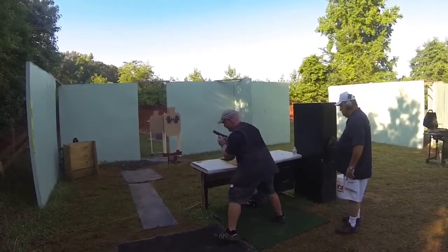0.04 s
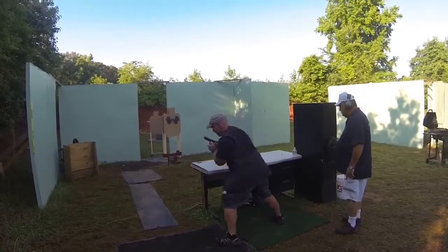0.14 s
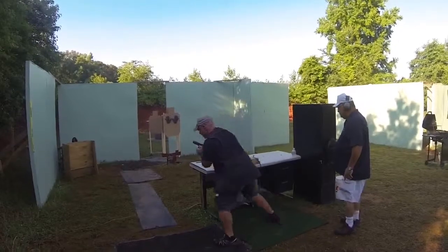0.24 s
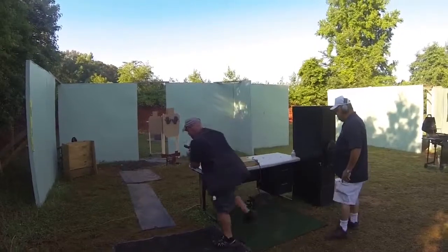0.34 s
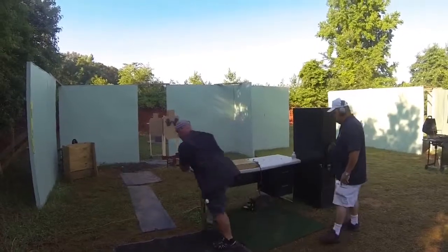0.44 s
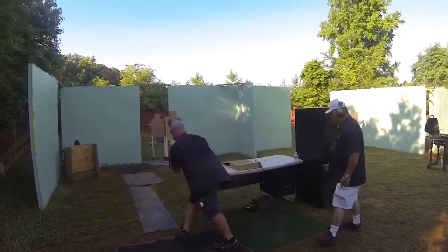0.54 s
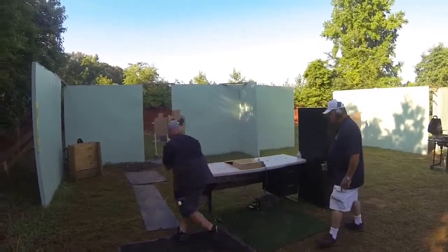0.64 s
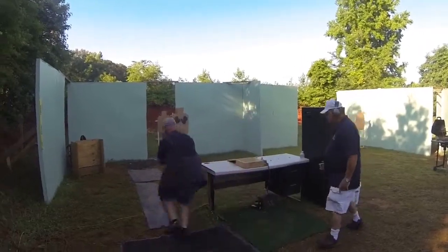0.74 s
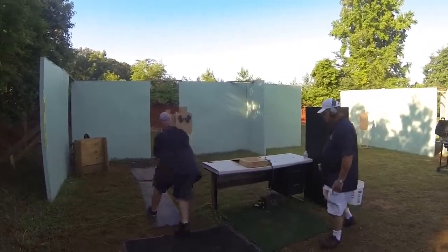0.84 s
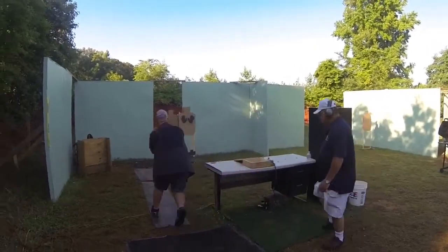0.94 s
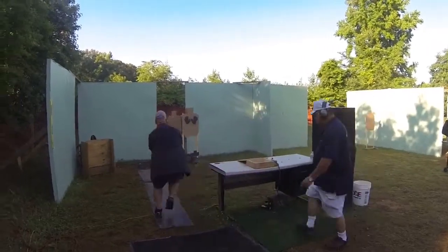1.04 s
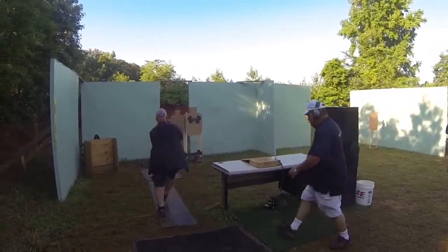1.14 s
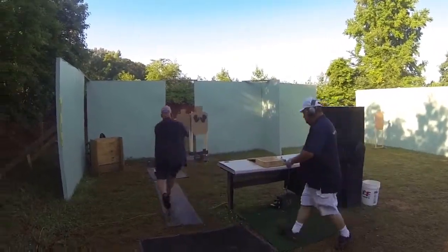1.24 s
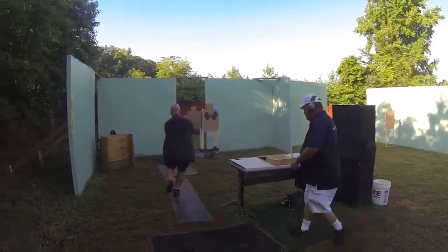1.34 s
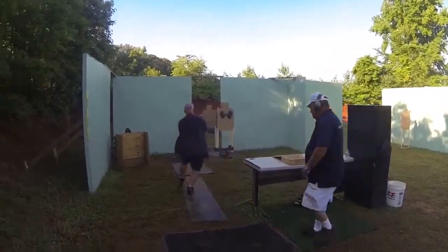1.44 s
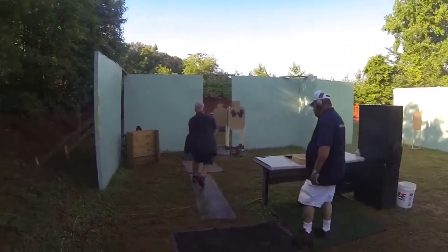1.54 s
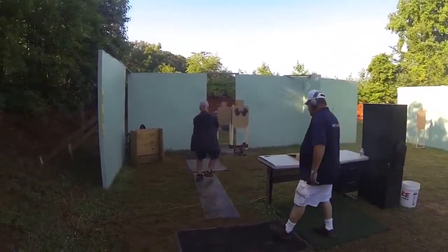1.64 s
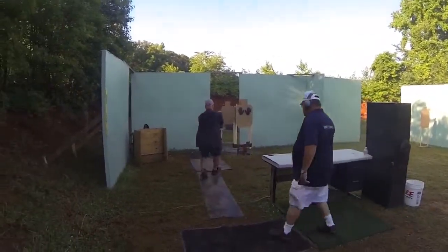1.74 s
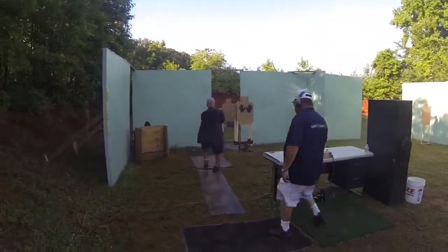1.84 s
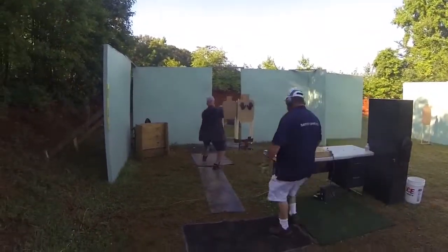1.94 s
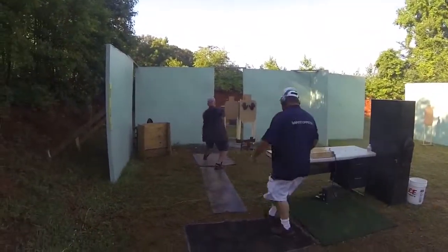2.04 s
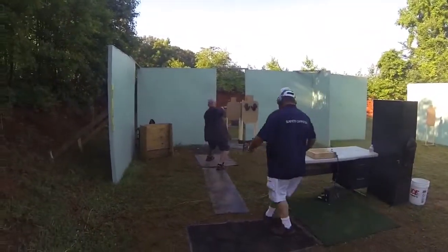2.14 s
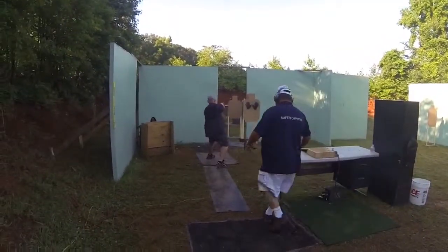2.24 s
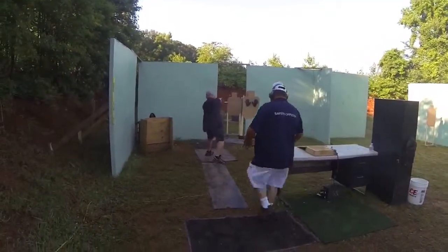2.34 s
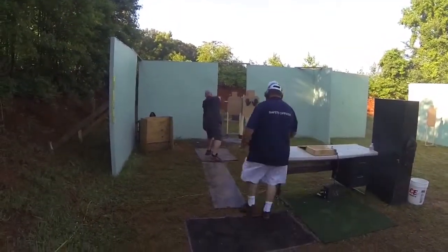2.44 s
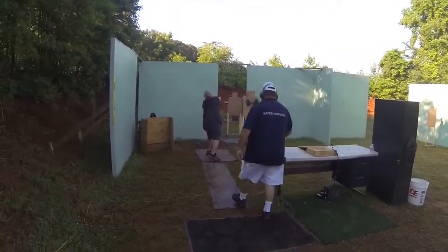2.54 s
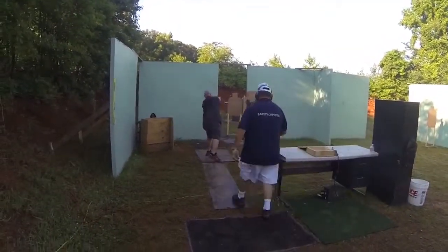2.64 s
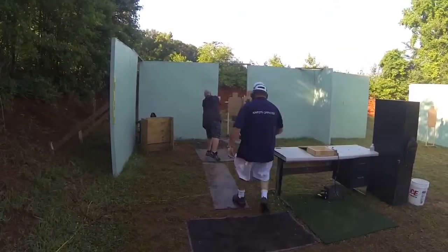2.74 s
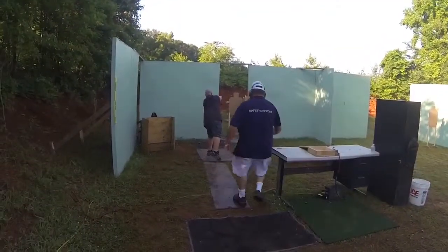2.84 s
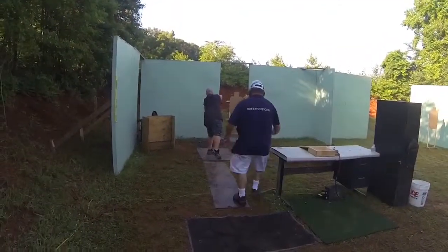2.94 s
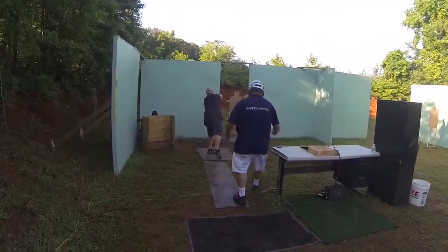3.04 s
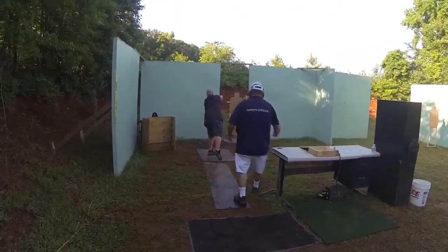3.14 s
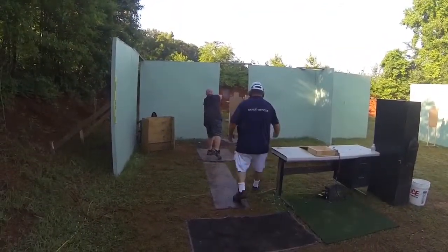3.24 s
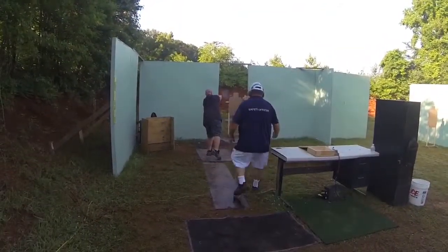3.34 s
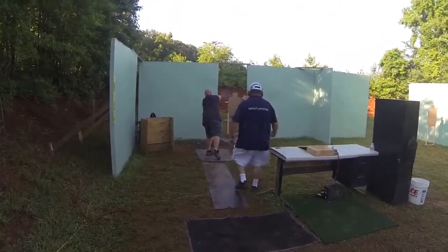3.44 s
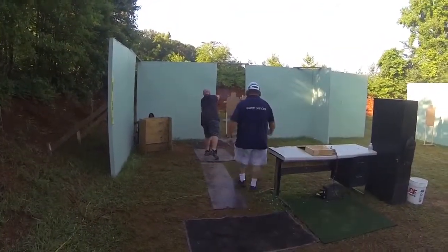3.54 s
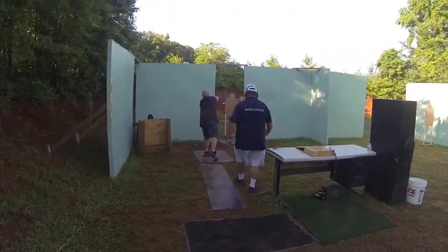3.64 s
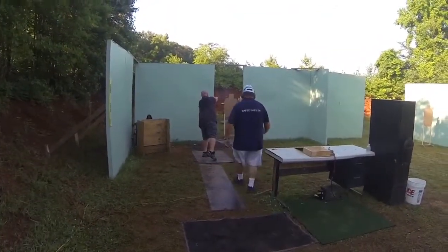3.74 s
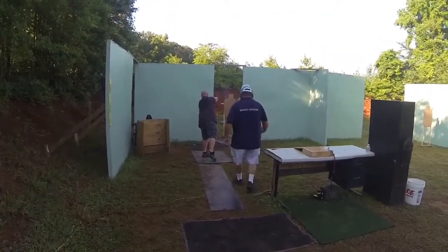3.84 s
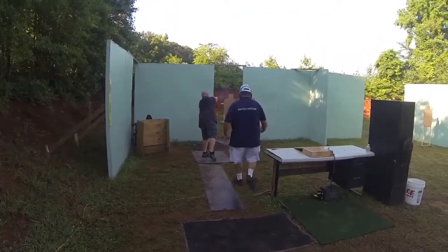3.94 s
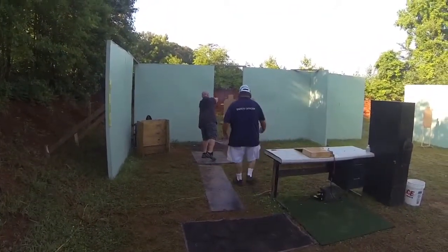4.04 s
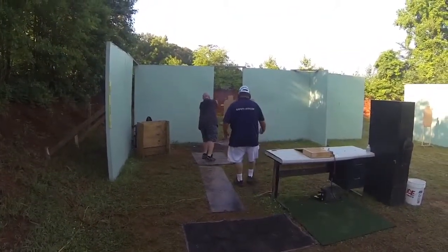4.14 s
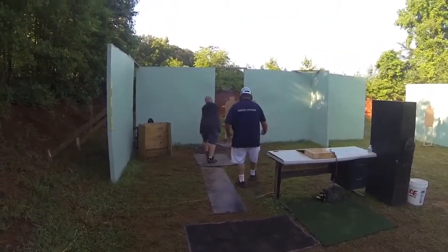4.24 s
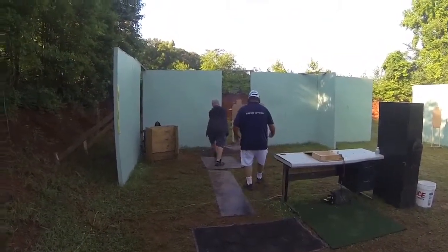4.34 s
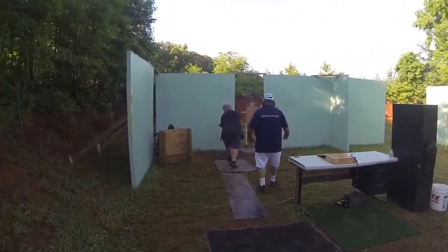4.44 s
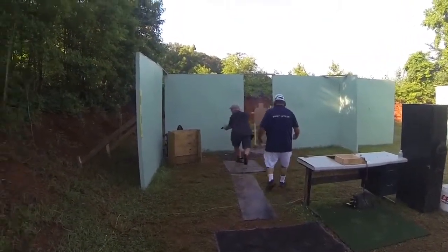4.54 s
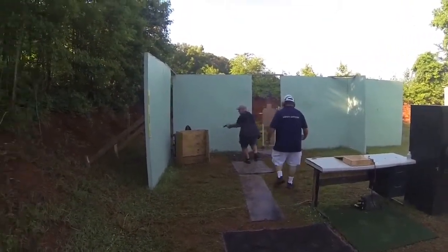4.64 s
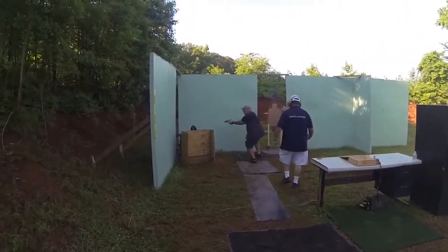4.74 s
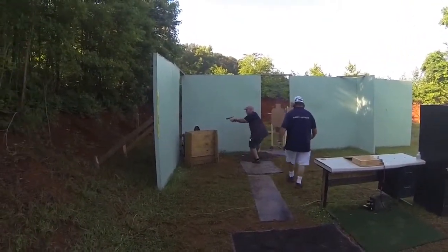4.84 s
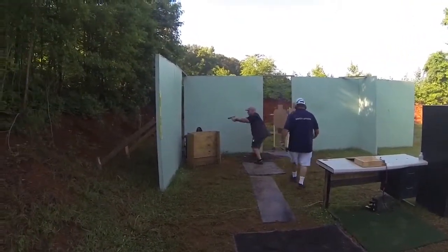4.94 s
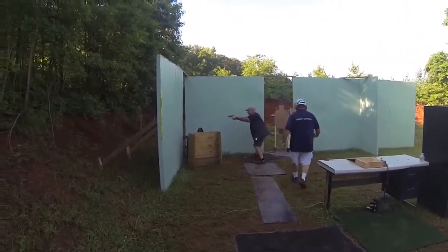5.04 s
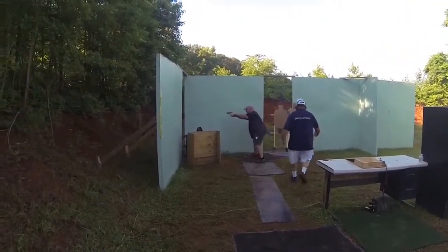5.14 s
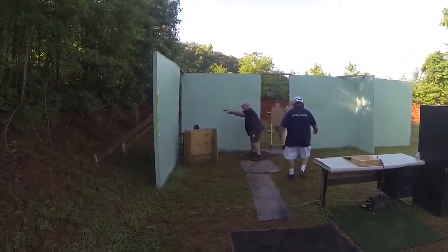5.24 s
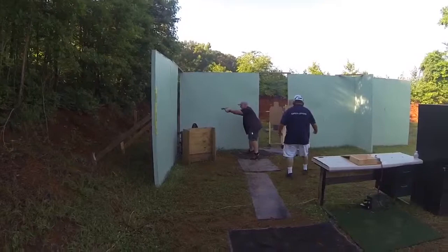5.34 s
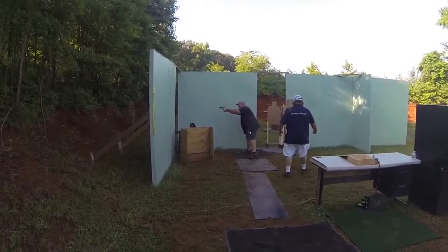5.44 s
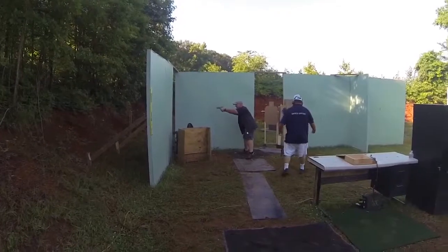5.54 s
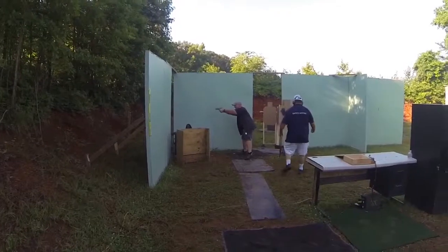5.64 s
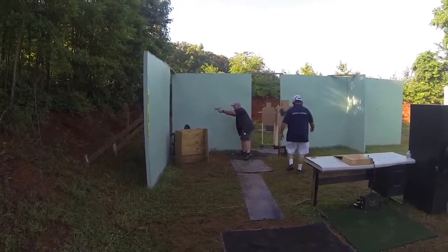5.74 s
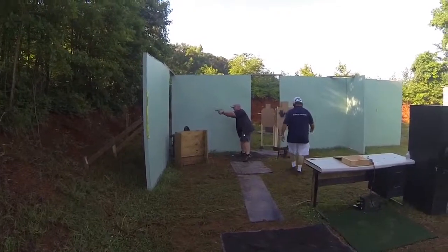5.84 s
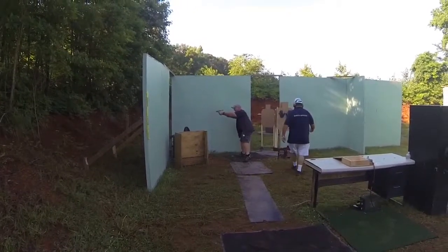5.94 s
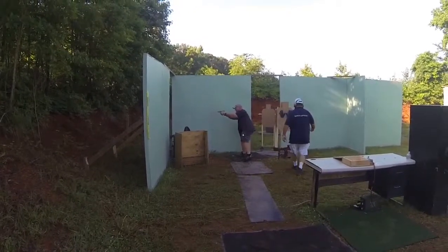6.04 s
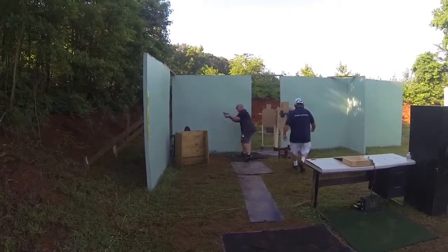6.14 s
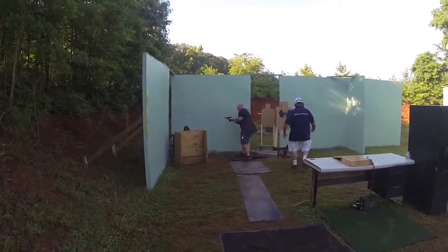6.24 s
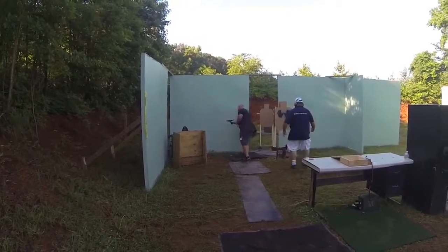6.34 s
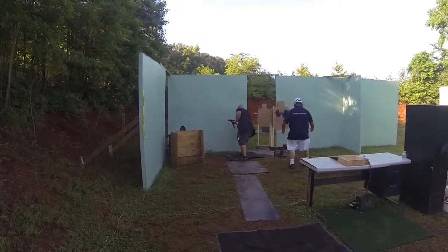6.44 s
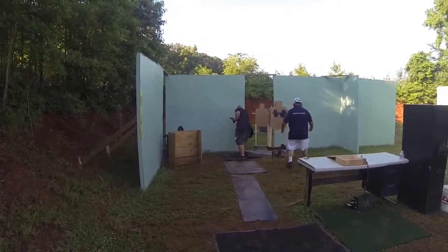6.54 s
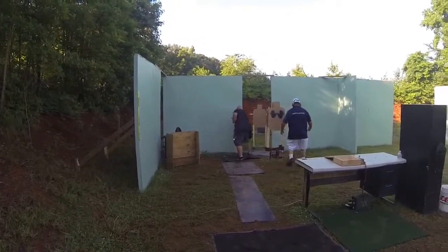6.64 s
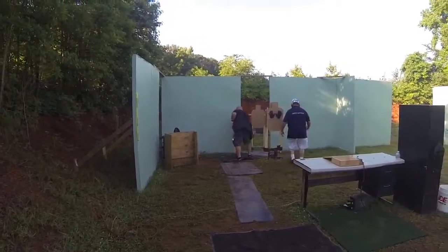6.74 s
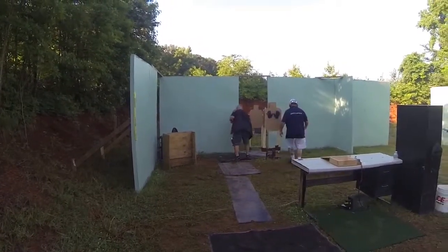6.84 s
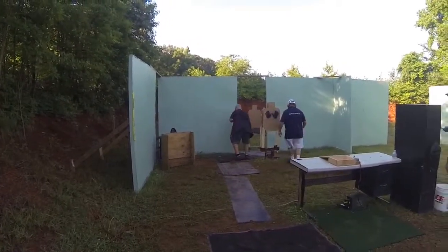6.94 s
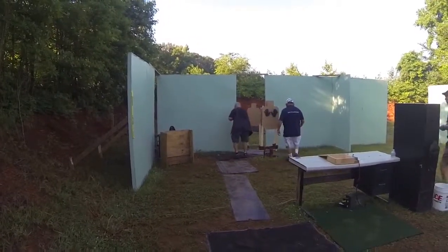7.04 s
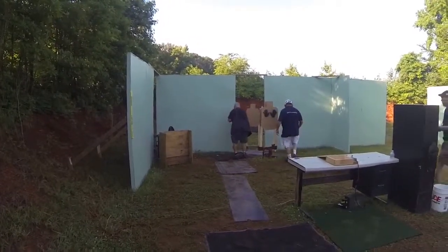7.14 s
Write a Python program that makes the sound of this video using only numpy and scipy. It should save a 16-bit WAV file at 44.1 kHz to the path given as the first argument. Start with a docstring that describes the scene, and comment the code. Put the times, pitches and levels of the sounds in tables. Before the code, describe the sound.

Between muffled gunshots from neighbouring range bays, a close handgun fires twice, then three times quickly, over light wind rumble.

```python
"""Outdoors, amid insect hiss, breeze and steps jostling a carried camera, two shots come over the berms
from neighbouring bays and a few faint bird notes sound. From 3.2 s a handgun is fired in this walled bay:
twice ahead, then three times quickly to the left. Each blast and its echoes ring the camera's case and
push its gain down; the woods answer late. Last, gear clacks and a third neighbouring shot arrives at 7 s."""
import sys
import numpy as np
from scipy import signal
from scipy.fft import rfft, irfft
from scipy.io import wavfile
from scipy.ndimage import uniform_filter1d, minimum_filter1d

SR = 44100
rng = np.random.default_rng(int(sys.argv[2]) if len(sys.argv) > 2 else 0)


def output_pcm(signal):
    """Save a mono or channel-first signal as 16-bit PCM at the path in sys.argv[1].

    Samples are clipped to [-1, 1] before scaling.
    """
    pcm = np.clip(np.atleast_2d(signal).T, -1, 1) * 32767
    wavfile.write(sys.argv[1], SR, np.round(pcm).astype(np.int16))


N = 317961
FFT_SIZE = 8192
HZ = np.fft.rfftfreq(FFT_SIZE, 1 / SR)

# Bird notes. Each row: start in seconds, length in seconds, first and last pitch in Hz, level in dB.
BIRD_NOTES = [(1.72, 0.18, 5130, 5220, -75), (2.686, .07, 4400, 3900, -76), (3.048, 0.036, 4370, 3850, -63)]
# The camera is carried along. Each row: start, briskest moment and end in seconds, rumble in dB.
CAMERA_MOVES = [(0.399, 0.543, 1.13, -39.5), (0.95, 1.273, 2.1, -37.5), (4.1, 4.44, 4.75, -39.5),
                (4.6, 5.253, 5.27, -40.5), (6.251, 6.797, 7.4, -47.5)]
# Heavy steps. Each row: start in seconds, level in dB.
HEAVY_STEPS = [(0.467, -36.5), (.712, -37), (1.198, -35.5), (1.319, -31), (5.099, -34.5), (5.234, -29),
               (5.3, -36.5), (6.705, -44)]
# Shots in other bays. Each row: start in seconds, front in dB, its lag in seconds, reverberation in
# relative dB, its rise in seconds, treble tilt in dB per octave, woods in dB, tree line in dB re woods.
NEIGHBOUR_SHOTS = [(0.0272, -23, 0, -12.5, 0.00072, 4, -50, 1),
                   (2.1682, -12, 0.002, -3, 0.00044, 3, -42.5, -12.5),
                   (6.990, -17.5, 0.015, -2.5, 0.029, 2.5, -42.5, -4)]
# Shots in this bay. Each row: start in seconds, blast, gas and reverberation in relative dB, aim.
NEAR_SHOTS = [(3.162, 22.5, 1.5, 12, "ahead"), (3.8526, 22, 4, 12, "ahead"),
              (5.4225, 27.5, 6.5, 11, "left"), (5.6332, 23.5, 1.5, 6, "left"), (5.8158, 22, 4, 9.5, "left")]
# Shading by the shooter's body. Each entry: aim, gain of the direct path in dB.
BODY_SHADE = {"ahead": -2.8, "left": 0}

# Indirect paths. Each row: delay in milliseconds, relative gain in dB.
BERM_PATHS = [(2.4, 7.5), (9.2, 4.5), (11.6, -1), (25, 4)]  # over and around the berms
GROUND_ECHOES = {"ahead": [(2.56, -2), (3.22, -2.2), (13.3, -5)], "left": [(1.75, 3.8), (3.23, 2),
                 (5.59, -8.5), (11.3, -15)]}  # off the ground and near objects, listed by aim
WALL_SLAPS = {"ahead": [(6.3, 0), (7.74, 1.4)], "left": []}  # off hard wall panels, listed by aim

# Spectra. Each row: frequency in Hz, relative level in dB.
AIR_SPECTRUM = [(30, -2.5), (150, 5), (400, 3.5), (800, 3), (1400, -6.5), (2000, 0), (3000, -7.5),
                (4500, -9), (6000, -13), (7600, -2), (8800, -15), (12000, -16.5), (15000, -24.5)]
WHINE_SPECTRUM = [(13500, -61.5), (14650, -7), (14800, 11), (14950, -10.5), (15600, -52)]
WIND_SPECTRUM = [(10, 1.5), (20, 2.5), (32, 4), (50, -3), (75, -11), (120, -21), (200, -20.5), (290, -38),
                 (600, -57)]
THUD_SPECTRUM = [(20, -12), (45, 2), (90, -1.5), (125, -10), (190, -3), (280, -26.5), (700, -40.5),
                 (3000, -62)]
CLACK_SPECTRUM = [(300, -24), (1700, -12), (2100, 3), (2800, -12), (5000, -26), (15000, -46)]
WOODS_SPECTRUM = [(50, -7), (200, -6), (700, -1), (1400, 3.5), (2500, -6.5), (4000, -17), (8000, -27),
                  (15000, -50.5)]
LEAF_SPECTRUM = [(500, -38), (3500, -7), (4400, -2), (5400, -2.5), (6200, -16), (8000, -19.5), (12000, -35)]
BERM_SPECTRUM = [(40, -3), (160, 8.5), (400, -0.5), (1000, 6.5), (1700, 9), (2300, 0), (3300, -7),
                 (3800, -11), (6000, -17.5), (7500, -20), (10000, -37), (15000, -47)]
FAR_FRONT_SPECTRUM = [(30, -1), (150, 19), (350, -6), (700, 15), (1300, 6.5), (1700, 22.5),
                      (2300, -16), (3500, -5.5), (7000, -15), (15000, -27)]
BAY_SPECTRUM = [(40, -56), (150, -0.5), (400, -0.5), (1000, 5), (2200, 4.5), (3300, -3.5), (3800, -7),
                (6000, -10.5), (8000, -16.5), (11000, -23), (15000, -31.5)]
GAS_SPECTRUM = [(300, -4), (1500, 2), (2600, 4), (4000, -6), (7000, -8.5), (10000, -19), (15000, -28)]
BLAST_SPECTRUM = [(30, -26), (200, -13), (500, -2.5), (1000, 1.5), (2000, -5.5), (3500, -6), (6500, -19),
                  (9000, -31), (13500, -30), (16000, -47)]

# Reverberation times. Each row: frequency in Hz, time to fall 60 dB in seconds.
BERM_DECAY = [(100, 0.21), (500, 0.43), (1400, 0.34), (3000, 0.45), (8000, 0.41), (15000, 0.58)]
BAY_DECAY = [(100, 0.6), (500, 0.36), (1400, 0.36), (3000, 0.42), (8000, 0.4), (15000, 0.24)]
# Resonances and notches of the camera case.
# Each row: centre in Hz, width in Hz, gain in dB for head-on blasts, gain in dB for scattered sound.
CASE_RESONANCES = [(655, 310, 4.5, 0.5), (987, 110, -1.5, -6), (1263, 226, 15, 12.5),
                   (1437.5, 173.5, 22.5, 9.5), (1893, 180, -8, -6.5), (2450, 680, 14, -1),
                   (2724, 98, -3.5, -1.5), (2975, 830, -3, 5), (4700, 310, -5, -1.5), (5150, 460, 6.5, 4)]


def amp(db):
    """Decibels as an amplitude ratio."""
    return 10 ** (np.asarray(db) / 20)


def curve(points, hz):
    """Linear interpolation of a table on a log-frequency axis."""
    f, value = np.transpose(points)
    return np.interp(np.log(hz + 1), np.log(f + 1), value)


def add(mix, s, sound):
    """Superposition: a sound joins the mix at s seconds."""
    part = mix[max(round(s * SR), 0):][:len(sound)]
    part += sound[:len(part)]


def minimum_phase(gain_db):
    """The causal impulse response of a gain curve on HZ, its phase given by the Hilbert transform."""
    log_gain = np.log(amp(np.r_[gain_db, gain_db[-2:0:-1]]))
    response = np.exp(np.conj(signal.hilbert(log_gain)))
    return irfft(response[:len(HZ)])[:len(HZ)]


def noise(spectrum, count):
    """White noise filtered to a spectrum, at unit rms."""
    gain = amp(curve(spectrum, np.fft.rfftfreq(count, 1 / SR)))
    x = irfft(rfft(rng.standard_normal(count)) * gain, count)
    return x / x.std()


def wander(t, per_s):
    """Random modulation of about unit size."""
    knots = rng.standard_normal(N // 10)
    return np.interp(t * per_s, np.arange(len(knots)), knots)


def delay(ms):
    """A pure delay: phase lag proportional to frequency."""
    return np.exp(-2j * np.pi * HZ * ms / 1000)


def reflections(pulse, echoes, dull_hz):
    """Multipath interference: delayed copies of a pulse add up, having lost treble."""
    paths = sum(amp(db) * delay(ms) for ms, db in echoes)
    return irfft(rfft(pulse, FFT_SIZE) * paths / (1 + (HZ / dull_hz) ** 2))


def air_and_insects():
    """Broadband noise of still air and insects, with a narrow band heard as a thin high whine."""
    return amp(-64.5) * noise(AIR_SPECTRUM, N) + amp(-86) * noise(WHINE_SPECTRUM, N)


def birds():
    """Frequency modulation: each note is a pure tone that glides and wavers."""
    out = np.zeros(N)
    for s, length, start_hz, end_hz, db in BIRD_NOTES:
        t = np.arange(int(length * SR)) / SR
        hz = np.geomspace(start_hz, end_hz, len(t)) * (1 + 0.0079 * wander(t, 150))
        tone = np.sin(2 * np.pi * np.cumsum(hz) / SR)
        add(out, s, amp(db) * tone * signal.windows.tukey(len(t), 0.5))
    return out


def breeze():
    """Turbulence rumbles on the microphone; gusts and the camera's own motion add in power."""
    t = np.arange(N) / SR
    airflow = amp(-47.5 + 2 * wander(t, per_s=1.7))
    for start, briskest, end, db in CAMERA_MOVES:
        pace = np.interp(t, [start, briskest, end], [0, 1, 0])
        airflow = np.hypot(airflow, amp(db) * pace)
    return noise(WIND_SPECTRUM, N) * airflow


def burst(spectrum, count, rise_s, fade_s):
    """A damped transient: noise with exponential rise and decay."""
    t = np.arange(count) / SR
    return noise(spectrum, count) * (1 - np.exp(-t / rise_s)) * np.exp(-t / fade_s)


def thud(db):
    """Structure-borne sound: one soft jolt through the camera's body."""
    return amp(db) * burst(THUD_SPECTRUM, SR // 3, rise_s=0.019, fade_s=0.028)


def jostling(jiggles_per_s=9.6):
    """Impacts on the camera: heavy steps, and irregular light jiggles whose power follows the pace."""
    out = np.zeros(N)
    for s, db in HEAVY_STEPS:
        add(out, s, thud(db))
    for start, briskest, end, rumble_db in CAMERA_MOVES:
        for beat in np.arange(start, end, 1 / jiggles_per_s):
            late, softness = rng.random(2)
            s = beat + late / jiggles_per_s
            pace = np.interp(s, [start, briskest, end], [0, 1, 0])
            add(out, s, np.sqrt(pace) * thud(rumble_db - 6 - 4.5 * softness))
    return out


def gear_clack():
    """A heavily damped resonance: gear knocks once as the shooter moves on."""
    out = np.zeros(N)
    add(out, 6.748, amp(-43) * burst(CLACK_SPECTRUM, SR // 10, rise_s=0.001, fade_s=0.007))
    return out


def woods(answer_db, answer_s, roll_t60):
    """Scattering by trees gives a long roll; a far tree line answers with a second swell."""
    t = np.arange(SR * 5 // 2) / SR
    roll = (1 - np.exp(-t / 0.091)) * amp(-60 * t / roll_t60)
    late = np.maximum(t - answer_s, 0)
    answer = amp(answer_db) * (1 - np.exp(-late / 0.12)) * amp(-60 * late / 1.98)
    flutter = amp(1.3 * wander(t, 22))
    return noise(WOODS_SPECTRUM, len(t)) * np.hypot(roll, answer) * flutter


def leaf_echo(lag_s=0.12, spread_s=0.045):
    """Backscatter: leaves on the berms return a far shot's treble as a late swell of hiss."""
    t = np.arange(SR // 2) / SR
    swell = np.exp(-((t - lag_s) / spread_s) ** 2 / 2)
    return amp(-55) * noise(LEAF_SPECTRUM, len(t)) * swell


def reverberation(spectrum, t60, rise_s, hold_s, treble_lag_s, tilt_db, flutter_db):
    """A diffuse field holds briefly, then decays band by band; treble scattered by leaves comes late."""
    hz, frame_s, bands = signal.stft(rng.standard_normal(SR), SR, nperseg=256)
    hz = hz[:, None]
    treble_octaves = np.log2(np.maximum(hz / 1500, 1))
    dying_s = np.hypot(frame_s, hold_s) - hold_s
    bands *= amp(curve(spectrum, hz) + tilt_db * treble_octaves - 60 * dying_s / curve(t60, hz))
    bands *= 1 - np.exp(-(frame_s + 0.011) / (treble_lag_s * treble_octaves + 1e-6))
    tail = signal.istft(bands, SR, nperseg=256)[1][:SR]
    t = np.arange(SR) / SR
    return amp(-19) * tail * (1 - np.exp(-t / rise_s)) * amp(flutter_db * wander(t, 160))


def neighbour_shots():
    """Barrier screening: the berms leave a dull front and mostly scattered sound."""
    out = np.zeros(N)
    front = -minimum_phase(curve(FAR_FRONT_SPECTRUM, HZ))
    arrivals = reflections(front, BERM_PATHS, dull_hz=6000)
    add(arrivals, 0, front)
    for s, db, lag_s, berms_db, rise_s, tilt_db, woods_db, answer_db in NEIGHBOUR_SHOTS:
        add(out, s + lag_s, amp(db) * arrivals)
        berms = reverberation(BERM_SPECTRUM, BERM_DECAY, rise_s, hold_s=0.11,
                              treble_lag_s=0.007, tilt_db=tilt_db, flutter_db=-0.1)
        add(out, s, amp(berms_db - 5) * berms)
        add(out, s, leaf_echo())
        add(out, s, amp(woods_db) * woods(answer_db, answer_s=0.25, roll_t60=2.06))
    return out


def blast_aftermath():
    """Turbulent gas spits after each near blast; reverberation follows from the bay and the woods."""
    out = np.zeros(N)
    for s, _, gas_db, bay_db, _ in NEAR_SHOTS:
        add(out, s, amp(gas_db) * burst(GAS_SPECTRUM, len(HZ), rise_s=0.0002, fade_s=0.0044))
        bay = reverberation(BAY_SPECTRUM, BAY_DECAY, rise_s=0.003, hold_s=0.01,
                            treble_lag_s=0.0014, tilt_db=1, flutter_db=1)
        add(out, s, amp(bay_db) * bay)
        add(out, s, amp(-34.5) * woods(answer_db=-20, answer_s=0.68, roll_t60=1.24))
    return out


def muzzle_blasts():
    """Two pressure fronts, air ahead of the bullet and then powder gas, reflect off ground and walls."""
    out = np.zeros(N)
    front = -minimum_phase(curve(BLAST_SPECTRUM, HZ))
    double_front = irfft(rfft(front, FFT_SIZE) * (1 + amp(8) * delay(ms=0.3)))
    for s, db, _, _, aim in NEAR_SHOTS:
        direct = amp(BODY_SHADE[aim]) * double_front
        ground = reflections(front, GROUND_ECHOES[aim], dull_hz=2010)
        walls = amp(2) * reflections(front, WALL_SLAPS[aim], dull_hz=9000)
        add(out, s, amp(db) * (direct + ground + walls))
    return out


def camera_case(x, head_on):
    """Resonance: the small case rings around its microphone, hardest when a front hits it squarely."""
    gain_db = sum((front_db if head_on else scattered_db) / (1 + (2 * (HZ - hz) / width) ** 2)
                  for hz, width, front_db, scattered_db in CASE_RESONANCES)
    return signal.oaconvolve(x, minimum_phase(gain_db))[:N]


def scene():
    """Head-on blasts and scattered sound superpose at one microphone inside the case."""
    scattered = blast_aftermath() + neighbour_shots() + gear_clack()
    scattered += air_and_insects() + birds() + breeze() + jostling()
    return (camera_case(muzzle_blasts(), head_on=True) + camera_case(scattered, head_on=False))[None]


def record(dry):
    """Compression: look-ahead gain dives at each blast and recovers slowly; clipping and low-pass follow."""
    threshold_db, recovery_db_per_s, cutoff_hz = -8, 18, 15200
    x = dry[0]
    level_db = 20 * np.log10(abs(x) + 1e-9)
    cut_db = 0.65 * np.maximum(level_db - threshold_db, 0)
    ahead_db = -minimum_filter1d(-cut_db, size=700)  # deepest cut within 8 ms either way
    recovery_db = recovery_db_per_s * np.arange(N) / SR
    duck_db = np.maximum.accumulate(ahead_db + recovery_db) - recovery_db
    ducked = x * amp(-uniform_filter1d(duck_db, size=200))
    clipped = ducked / (1 + ducked ** 8) ** (1 / 8)  # rounded knee
    lowpass = signal.firwin(255, cutoff_hz, window=("kaiser", 8), fs=SR)
    return signal.oaconvolve(clipped, lowpass, "same")[None]


dry = scene()
out = record(dry)
output_pcm(out)
```